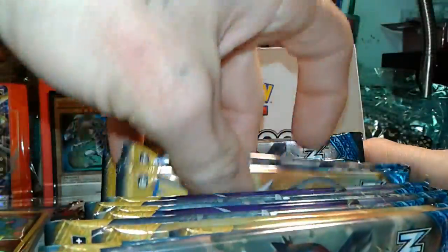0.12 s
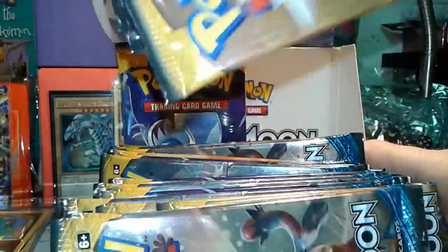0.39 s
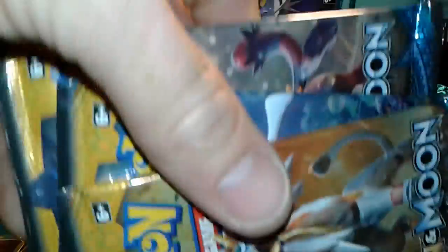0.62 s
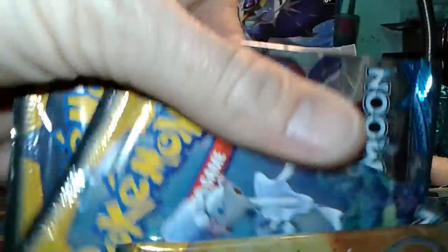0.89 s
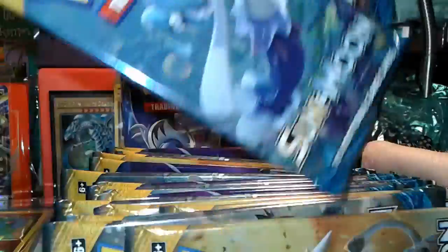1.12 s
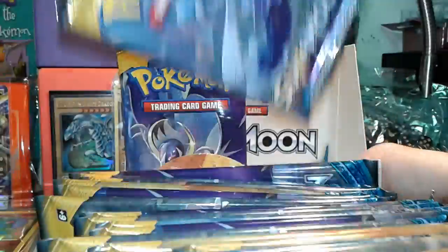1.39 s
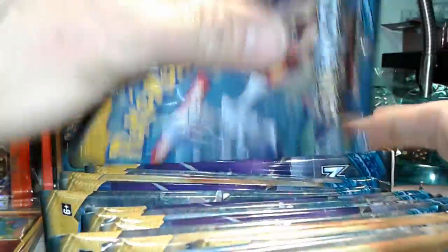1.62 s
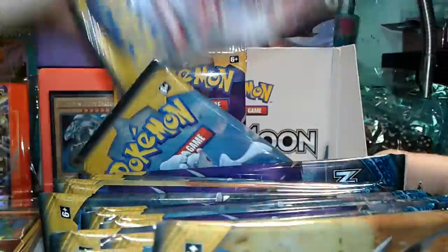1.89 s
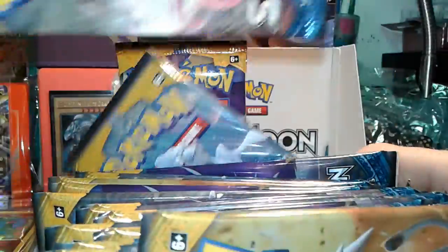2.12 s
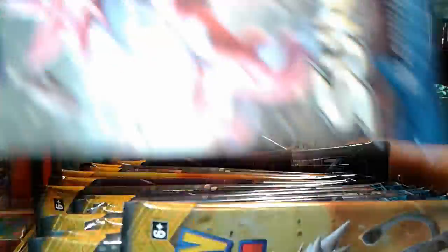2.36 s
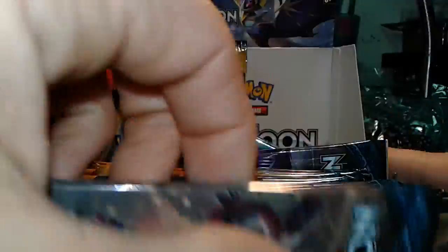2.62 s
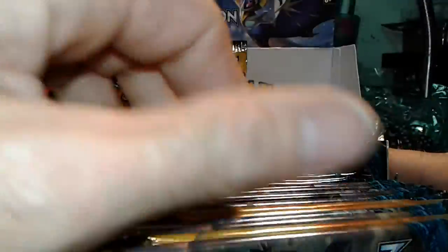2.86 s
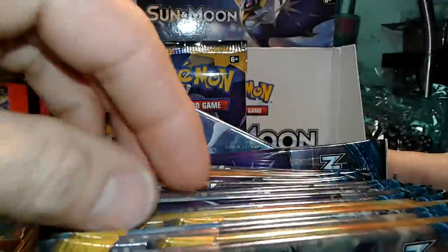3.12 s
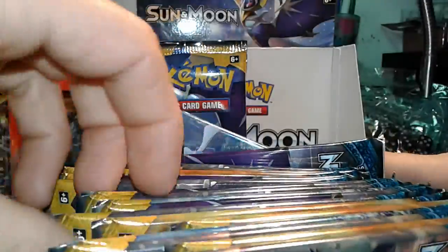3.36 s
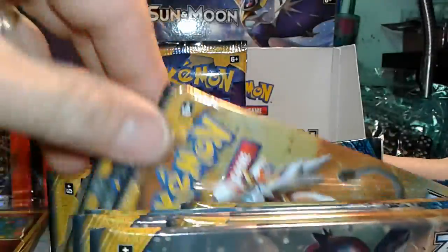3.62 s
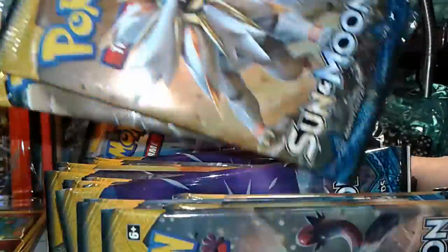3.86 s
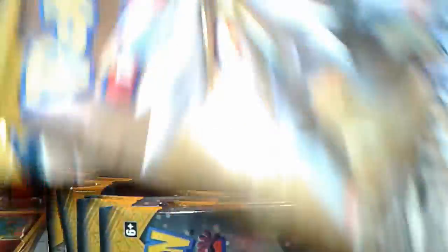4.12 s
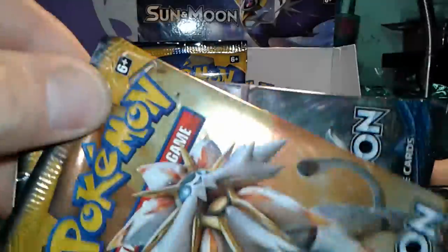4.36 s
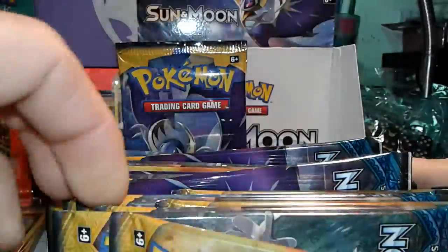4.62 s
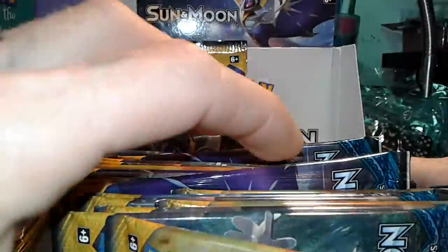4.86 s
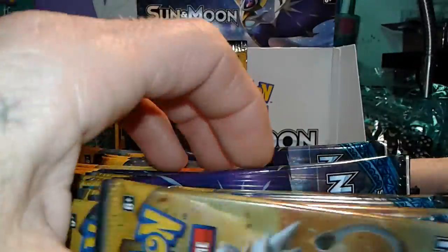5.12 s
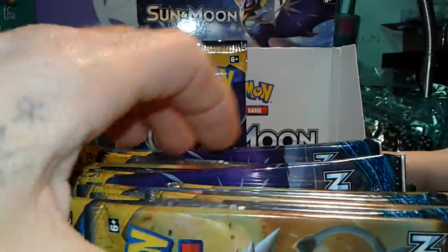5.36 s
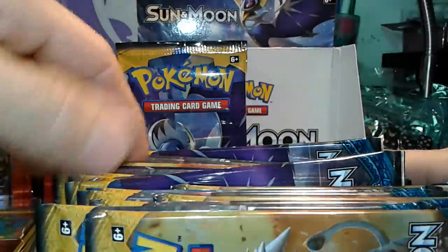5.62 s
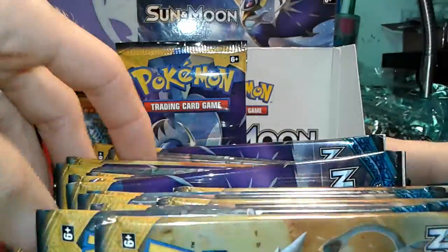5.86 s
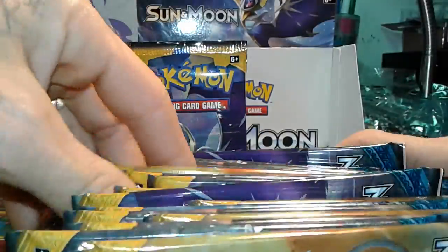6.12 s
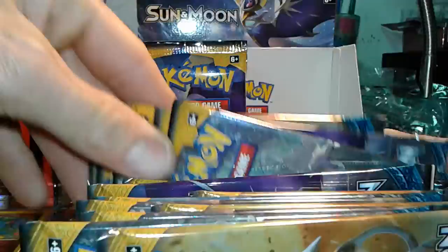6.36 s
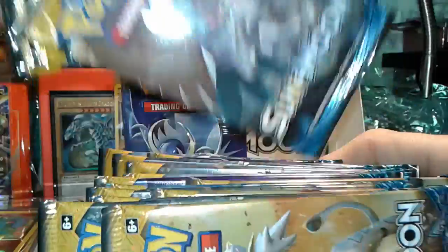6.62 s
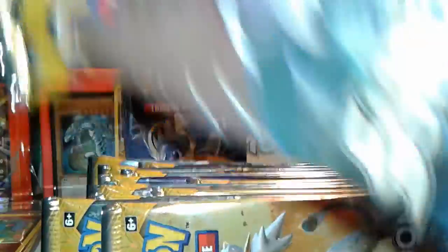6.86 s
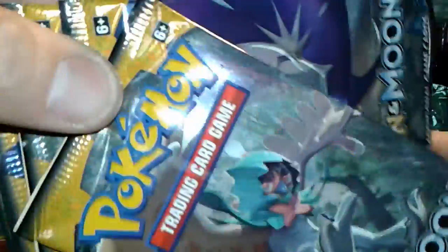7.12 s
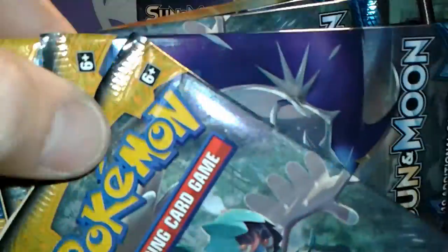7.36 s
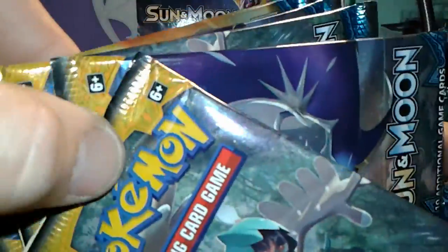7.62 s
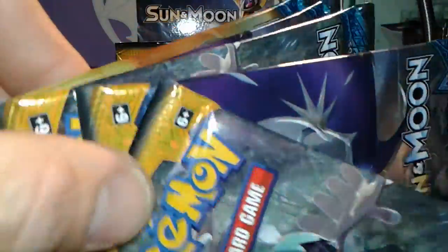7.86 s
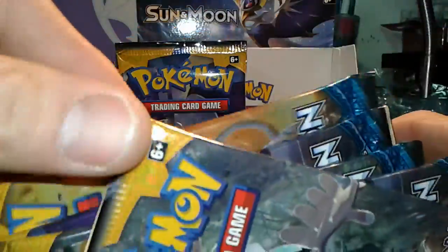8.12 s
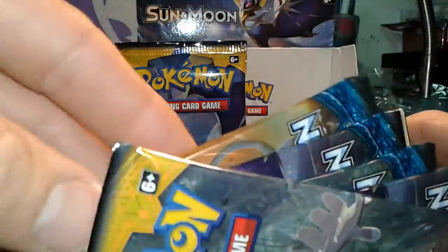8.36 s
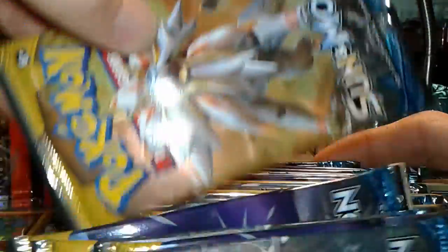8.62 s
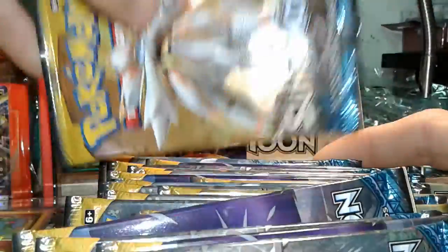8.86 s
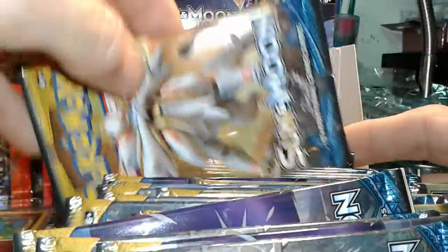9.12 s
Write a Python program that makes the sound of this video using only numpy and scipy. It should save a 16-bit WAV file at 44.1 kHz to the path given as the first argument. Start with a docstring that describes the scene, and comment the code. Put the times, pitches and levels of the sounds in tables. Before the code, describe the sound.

Hands rummage through sealed foil packs in a cardboard box, heard close in stereo. Crisp creases snap singly and in clumps over papery sliding hiss. Soft hollow knocks join early, and a tiny squeak comes near the middle. Crackling then grows denser and louder, with swishes and heavier box thumps, before thinning at the end. The room is small and quiet.

```python
"""Hands shuffle sealed foil packs in a cardboard box, close to a pair of spaced microphones in a quiet room.
From the start a faint low hum dies away under sheets hissing past each other and a stack rubbing the box.
Creases in the foil snap singly and in clumps of small crackles, each a crack, a short ring and a low pop.
Soon stacks of cards knock on the box and ring its low modes, and packs swish past each other.
Later short scrapes hold and stop dead, and once the foil squeaks as it sticks and slips."""
import sys
import numpy as np
from scipy import signal
from scipy.io import wavfile

SR = 44100
rng = np.random.default_rng(int(sys.argv[2]) if len(sys.argv) > 2 else 0)


def dump_mix(stems):
    """Bounce the given channels to the path in sys.argv[1] as a 16-bit WAV at rate SR."""
    frames = np.atleast_2d(stems).T  # one column per channel
    limited = np.clip(frames, -1, 1)  # hard clip at full scale
    pcm = np.round(limited * 32767).astype(np.int16)
    wavfile.write(sys.argv[1], SR, pcm)


def how_loud(loudness_db):
    """Turn decibels into a plain amplitude multiplier (0 dB gives 1, 20 dB gives 10)."""
    steps = np.asarray(loudness_db, float) / 20
    return 10 ** steps


N = 407484

# loud creases snapping: time_s of the peak, level_db of the crack before panning, ring_hz,
# pan_db (left over right, held within 13 dB)
SNAPS = [(0.1053, -20, 6760, 5.5), (0.151, -22, 1900, 2), (0.1941, -22.5, 1750, 5.5), (0.302, -21, 1340, 7),
         (0.336, -22, 1630, -2), (0.388, -22, 1700, 1), (0.454, -41, 4480, -7), (0.49, -28.5, 1800, 3),
         (0.599, -20.5, 5160, 4.5), (0.6186, -15, 4000, 7), (0.7293, -13.5, 4520, 9),
         (0.7415, -41, 1300, 3), (0.817, -18, 3820, 4.5), (0.882, -37, 4380, 6), (0.916, -16, 1370, -4.5),
         (0.9253, -17, 3260, 3.5), (0.9386, -19, 1790, 4.5), (0.9912, -24, 2980, 8.5),
         (1.039, -25, 2110, 1), (1.075, -30, 2380, -13), (1.085, -30, 1410, -7), (1.178, -24, 1400, -4),
         (1.2066, -9, 7860, -3), (1.217, -21, 6850, -2), (1.246, -26, 1530, -0.5), (1.398, -18, 2070, -4.5),
         (1.436, -16, 1290, -3.5), (1.479, -43, 6500, 2), (1.512, -24.5, 1430, -6), (1.521, -32, 2180, -14),
         (1.62, -15.5, 6470, -2.5), (1.815, -29, 3930, 2), (1.9316, -19.5, 3000, 8),
         (1.998, -28.5, 3470, 7), (2.121, -33.5, 3190, 7.5), (2.1686, -25, 6500, -6),
         (2.1935, -23, 1700, -5), (2.2005, -25, 7800, 0.5), (2.2125, -25, 8050, 13),
         (2.2261, -15, 3280, 6.5), (2.335, -28, 7600, 10.5), (2.391, -27.5, 4960, 3.5),
         (2.448, -38, 7100, -12.5), (2.563, -19.5, 6040, 4.5), (2.628, -24.5, 3370, 2.5),
         (2.648, -37, 5000, 2), (2.707, -32, 1470, 2), (2.8063, -21.5, 4700, -1.5), (2.814, -20, 3740, -2),
         (2.84, -20.5, 4000, 2.5), (2.8533, -19.5, 6400, -1), (2.963, -34, 3000, -2.5),
         (3.135, -36, 6900, 0), (3.139, -32, 2010, 13), (3.146, -30, 2080, 3), (3.257, -31, 4370, 6),
         (3.321, -24.5, 4970, 5), (3.3952, -17, 1330, 2.5), (3.413, -25, 2020, 1), (3.43, -19, 4400, 8),
         (3.4783, -20.5, 1940, 11), (3.498, -23, 4070, 2.5), (3.5205, -23, 4150, 11),
         (3.541, -12.5, 4950, 7.5), (3.561, -27, 4080, 4), (3.636, -20, 3260, 6.5), (3.685, -21.5, 1260, 5),
         (3.715, -30, 3560, -7), (3.748, -23, 3560, 4), (3.7625, -10, 3830, 6.5), (3.832, -19.5, 3440, 8.5),
         (3.949, -41, 1810, 3), (3.971, -47, 3000, 6), (3.983, -31.5, 3130, 8), (3.995, -49, 9000, 0),
         (4.009, -18.5, 5600, 1), (4.1106, -34, 2980, 11), (4.187, -18.5, 3490, 8), (4.208, -10.5, 5250, 8),
         (4.2298, -16, 1900, -8.5), (4.2867, -14.5, 4600, -4.5), (4.294, -18.5, 2790, 2.5),
         (4.3298, -11.5, 4000, 11.5), (4.342, -15, 4370, 2.5), (4.354, -15.5, 4470, 2.5),
         (4.425, -18, 6560, 5), (4.4584, -13.5, 4700, 7), (4.488, -25, 2040, 2), (4.5071, -13, 2270, 6),
         (4.512, -9.5, 3070, 3), (4.5331, -7.5, 5030, 3), (4.555, -12.5, 3280, 2.5),
         (4.5684, -12.5, 4660, 3.5), (4.654, -12, 3700, 12), (4.676, -33, 3840, 8), (4.693, -5, 6500, 1.5),
         (4.714, -18, 3700, 3), (4.7693, -15, 5960, 1), (4.812, -30, 1500, 4.5), (4.906, -32.5, 1410, 7.5),
         (5.027, -16, 1220, 6.5), (5.116, -37, 3340, 2), (5.1407, -16.5, 7100, -3.5),
         (5.174, -12.5, 6300, 3.5), (5.238, -23, 5380, 1), (5.257, -26, 2310, 0), (5.266, -21, 3900, -6),
         (5.3799, -24.5, 1340, -3.5), (5.3871, -20, 5100, -5), (5.454, -25, 4070, 6),
         (5.48, -35, 1310, -15), (5.526, -20.5, 6960, 5), (5.563, -23, 4100, -9), (5.691, -31, 4000, 4),
         (5.7, -16.5, 3950, 3.5), (5.75, -25, 4170, 9), (5.7665, -16, 1770, 5.5), (5.867, -19.5, 2310, -4),
         (5.9343, -23.5, 3770, 13), (5.979, -25, 1910, 7), (6.047, -23, 6000, 3.5), (6.063, -19.5, 1480, 3),
         (6.12, -28, 1780, -9), (6.129, -21, 7500, 7.5), (6.135, -21, 2110, 8), (6.284, -20.5, 8120, 3),
         (6.296, -12.5, 4420, -2), (6.3492, -18, 1280, 4), (6.396, -11.5, 3740, 8.5),
         (6.4815, -14, 3460, 10), (6.519, -12.5, 3320, 4), (6.5833, -38, 1630, 23), (6.6627, -31, 1660, 10),
         (6.681, -15.5, 6060, 8), (6.719, -18.5, 5740, -5.5), (6.742, -41, 1800, -3),
         (6.7664, -15, 3900, 6), (6.8561, -18, 3380, -2), (6.884, -12.5, 2130, 4), (6.9001, -20, 2580, -4),
         (6.913, -9, 2420, 4), (6.9452, -12.5, 1390, -2), (6.985, -41, 9000, -3), (7.003, -23, 3500, 1),
         (7.0285, -12.5, 6430, 7), (7.052, -13.5, 3900, 18.5), (7.063, -26, 4000, -1),
         (7.1394, -22.5, 3300, -1.5), (7.1604, -20.5, 1280, 3.5), (7.202, -33, 2000, 5),
         (7.2254, -13, 7350, 2), (7.25, -30, 3440, 14), (7.3308, -28, 3670, 8.5),
         (7.3441, -20.5, 3100, 4.5), (7.359, -24.5, 9100, 1), (7.42, -17, 3900, 1), (7.452, -18, 8180, 4.5),
         (7.4789, -13, 4100, 13.5), (7.5264, -18, 4310, 2.5), (7.5437, -18.5, 1360, -5.5),
         (7.6328, -24, 1740, -5.5), (7.6814, -23, 7100, -0.5), (7.694, -33, 3040, -9),
         (7.718, -39, 1720, -2), (7.7766, -19, 7600, 1.5), (7.8, -30, 1300, 2), (7.8256, -13.5, 5730, -5.5),
         (7.837, -18.5, 7750, 8.5), (7.865, -26.5, 3360, 12), (7.8957, -20, 4850, -1.5),
         (7.929, -22, 4320, 4), (7.9532, -12, 1260, -9), (7.977, -20, 4180, 4), (8.004, -17, 4150, 17),
         (8.008, -19, 7500, 2), (8.027, -19, 5800, -0.5), (8.034, -15, 3640, 1.5),
         (8.0404, -13.5, 7800, -6.5), (8.0554, -24, 3230, -14), (8.074, -21, 3700, 1),
         (8.102, -20, 5080, 6), (8.114, -16.5, 6900, -9.5), (8.122, -18, 6300, 0), (8.135, -15, 4940, -0.5),
         (8.145, -11, 6000, -2), (8.148, -13.5, 3380, 12), (8.22, -24.5, 4440, 5), (8.2832, -7, 6240, 12.5),
         (8.385, -24.5, 3260, 10), (8.401, -29, 4500, 6), (8.499, -28, 4040, -1), (8.524, -11, 1280, 8),
         (8.536, -9, 2400, 7.5), (8.547, -28.5, 1600, -4), (8.572, -13.5, 7250, -2), (8.641, -44, 2080, -7),
         (8.79, -40, 6000, -5), (8.869, -29.5, 2310, -3.5), (8.8784, -31, 3150, -4.5),
         (8.957, -26, 3300, -4.5), (8.9766, -31, 6070, 4)]

LEAD_S = .004         # a crease starts this long before its peak
HANDS_LEFT_DB = 1.5   # the hands work a little to the left


def rms_one(x):
    """Scales to unit rms."""
    return x / np.sqrt(np.mean(x ** 2) + 1e-20)


def in_time(rows):
    """Reads the columns of a curve at every sample."""
    s, *columns = np.transpose(rows)
    return [np.interp(np.arange(N) / SR, s, c) for c in columns]


def at_hz(points, hz):
    """Reads a spectrum on a log frequency axis."""
    points_hz, values = np.transpose(points)
    return np.interp(np.log(hz), np.log(points_hz), values)


def sides(pan_db):
    """Left and right gain, from left over right in dB."""
    pan_db = np.clip(pan_db, -13, 13)
    return how_loud(np.array([[pan_db / 2], [-pan_db / 2]]))


def drift(rate_hz):
    """Slow chance of spread 1: noise through two equal poles, drawn at every 40th sample."""
    r = np.exp(-80 * np.pi * rate_hz / SR)
    slow = signal.lfilter([1], [1, -2 * r, r * r], rng.standard_normal(N // 40 + 2002))
    slow = slow[2000:]   # past the filter's start
    return np.interp(np.arange(N) / 40, np.arange(len(slow)), rms_one(slow - slow.mean()))


def resonance(hz, width_hz):
    """Filter coefficients of one resonance, gain 1 on top."""
    r = np.exp(-np.pi * width_hz / SR)
    return [(1 - r * r) / 2, 0, (r * r - 1) / 2], [1, -2 * r * np.cos(2 * np.pi * hz / SR), r * r]


def resonate(x, hz, width_hz):
    """Rings one resonance with a sound."""
    b, a = resonance(hz, width_hz)
    return signal.lfilter(b, a, x)


def add(out, s, sound):
    """Mixes a short sound in at a time."""
    i = max(round(s * SR), 0)
    out[:, i:i + sound.shape[1]] += sound[:, :N - i]


def banded_noise(spectrum, patchy_db, flutter_db):
    """Half-octave bands of stereo noise with a shared flutter and patches of their own; rms 1."""
    # how alike the two sides are: pitch_hz, likeness (-1 opposite, 1 the same)
    likeness = [(60, 0.99), (130, 0.51), (290, 0.72), (640, 0.74), (1410, -0.37), (3100, 0.15),
                (6820, -0.074), (15000, 0.12)]
    out = 0
    edges = 30 * 2 ** np.arange(0, 9.6, .5)
    white = rng.standard_normal((2, 2, N))   # neighbouring bands take different noise
    for k, (low, high) in enumerate(zip(edges, np.minimum(edges[1:], .45 * SR))):
        hz = np.sqrt(low * high)
        if at_hz(spectrum, hz) < -29:   # too faint to matter
            continue
        band = signal.butter(2, [low, high], "band", fs=SR, output="sos")
        mid, side = signal.sosfilt(band, white[k % 2])
        alike = np.clip(at_hz(likeness, hz), -1, 1)
        gain = how_loud(at_hz(spectrum, hz) + patchy_db * drift(11.7))
        out = out + gain * (np.sqrt(1 + alike) * mid + np.sqrt(1 - alike) * side * [[1], [-1]])
    flutter = drift(28.0) + 0.77 * drift(187)
    return rms_one(out * how_loud(flutter_db * flutter))


def air():
    """Room tone: a faint, slightly uneven bed of noise."""
    # room tone spectrum: pitch_hz, level_db (relative, per Hz)
    air_spectrum = [(18, -31), (30, -12.5), (131, 7), (204, -9.5), (1130, -28), (1630, -26.5), (2500, -18),
                    (5450, -32), (7270, -23), (16000, -33)]
    return how_loud(-62.5) * banded_noise(air_spectrum, patchy_db=2.5, flutter_db=1.0)


def hum():
    """A faint low sine of gliding pitch at the start, which fades out."""
    # the hum: time_s, pitch_hz, level_db (rms, before the last 0.12 s fade)
    hum_curve = [(0.0, 128, -60), (0.27, 126.2, -60), (0.6, 138, -64)]
    hz, db = in_time(hum_curve)
    fade = np.clip((hum_curve[-1][0] - np.arange(N) / SR) / 0.12, 0, 1)
    return np.sqrt(2) * how_loud(db) * fade * np.sin(2 * np.pi * np.cumsum(hz) / SR)


def movement():
    """Sums the power of sliding, swishes and settling foil: hiss dB, swish share, ring Hz, treble dB."""
    # how hard the hands move the packs, as hiss of sliding sheets before they catch: time_s, level_db
    sliding_curve = [(0.0, -45), (0.063, -60.5), (0.55, -44.5), (0.89, -55), (1.0, -45.5), (1.45, -50),
                     (1.68, -52.5), (1.772, -62.5), (1.82, -49), (2.113, -56.5), (2.335, -44), (2.481, -70),
                     (2.69, -63), (2.73, -44), (2.93, -56), (2.99, -56.5), (3.11, -60.5), (3.2, -58),
                     (3.263, -51), (3.55, -43), (3.86, -41), (4.0, -63.5), (4.176, -62), (4.3, -49.5),
                     (4.72, -41.5), (4.882, -79), (4.91, -57.5), (5.1, -44.5), (5.33, -57.5), (5.52, -39),
                     (5.62, -40), (5.68, -51.5), (5.92, -49.5), (6.25, -40.5), (6.4, -47.5), (6.6, -39.5),
                     (6.8, -46), (7.06, -48.5), (7.217, -56), (7.47, -45), (7.755, -63.5), (7.95, -36.5),
                     (8.14, -56), (8.21, -48), (8.25, -40), (8.32, -48), (8.435, -60.5), (8.56, -41),
                     (8.61, -63), (8.66, -47), (8.735, -57), (8.84, -64), (9.04, -63), (9.195, -47.5),
                     (9.24, -47)]
    # swishes of one pack past another: time_s of the peak, level_db, length_s, ring_hz of the free foil
    swishes = [(0.257, -41, 0.081, 3900), (0.408, -39.5, 0.038, 1360), (0.927, -30, 0.019, 3040),
               (1.081, -38.5, 0.15, 1430), (1.528, -39.5, 0.03, 2250), (1.657, -34, 0.022, 1300),
               (1.99, -41, 0.17, 2070), (2.542, -51, 0.085, 3160), (2.61, -43, 0.087, 3440),
               (2.872, -38, 0.055, 1360), (3.147, -40.5, 0.057, 1620), (3.452, -35, 0.13, 4080),
               (3.748, -38, 0.071, 4100), (4.292, -39.5, 0.04, 3860), (4.505, -28, 0.041, 2170),
               (4.654, -39, 0.086, 3750), (4.94, -44, 0.075, 1340), (5.163, -33, 0.12, 1900),
               (5.253, -35, 0.044, 5130), (5.765, -29, 0.02, 1950), (5.996, -38, 0.11, 1900),
               (6.156, -32.5, 0.083, 3020), (6.302, -34, 0.045, 1750), (6.663, -35, 0.12, 1630),
               (6.903, -25.5, 0.047, 2750), (7.073, -39, 0.11, 3180), (8.042, -34.5, 0.15, 3170),
               (8.136, -31.5, 0.088, 4940), (8.514, -37, 0.1, 2640), (9.208, -38.5, 0.097, 1300)]
    rise_share, edge_db, roundness = 0.52, 14, 1.19   # drop at the ends; 1 pointed, 2 rounded swell
    settle_db, settle_s = -24, 0.008   # dying hiss after a snap: level under the peak, time constant
    stall_share, stall_s = 0.35, 0.11  # most sliding power lost before a snap, time constant
    t = np.arange(N) / SR
    swish, octaves = 0, 0
    for s, db, length_s, hz in swishes:
        away = np.maximum((s - t) / rise_share, (t - s) / (1 - rise_share)) / length_s
        one = how_loud(2 * (db - edge_db * np.minimum(away ** roundness, 8)))
        swish = swish + one
        octaves = octaves + one * np.log2(hz)
    jolts = np.full(N, 1e-18)
    for s, db, hz, pan_db in SNAPS:
        jolts[int(s * SR)] = how_loud(2 * (db + settle_db))
    settling = signal.lfilter([1], [1, -np.exp(-2 / (settle_s * SR))], jolts)
    # run backwards in time: the sheets catch just before a fold gives way
    upcoming = (jolts > 1e-17)[::-1] + 1e-18
    ahead = signal.lfilter([1], [1, -np.exp(-1 / (stall_s * SR))], upcoming)[::-1]
    stall = np.clip(stall_share * np.minimum(ahead, 1), 0, .95)
    sliding = how_loud(2 * in_time(sliding_curve)[0]) * (1 - stall)
    power = sliding + swish + settling
    swishing = swish / power
    ring_hz = 2 ** (octaves / swish)
    # tighter foil rings higher and brighter
    treble_db = -2 + 4 * swishing * np.log2(ring_hz / 3000)
    return 10 * np.log10(power), swishing, ring_hz, treble_db


def jerks():
    """Gain of the sliding hiss: a smooth half, and a half of short uneven bursts at random moments."""
    slips_per_s, slip_s, spread_db, smooth_share = 200, .001, 5, .5
    sizes = how_loud(spread_db * np.minimum(rng.exponential(1, N), 3))
    slips = sizes * (rng.random(N) < slips_per_s / SR)
    bursts = signal.lfilter([1], [1, -np.exp(-1 / (slip_s * SR))], slips + 1e-18)
    return smooth_share + (1 - smooth_share) * rms_one(bursts)


def foil_ring(x, hz):
    """A resonance whose pitch follows the stretch of free foil, stepped block by block."""
    out, state = np.zeros_like(x), np.zeros((2, 2))
    for i in range(0, N, 256):
        b, a = resonance(hz[i], 0.12 * hz[i])
        out[:, i:i + 256], state = signal.lfilter(b, a, x[:, i:i + 256], zi=state)
    return out


def slide(hiss_db, swishing, ring_hz, treble_db):
    """Sheets sliding in small jerks: banded hiss that rings with the foil in swishes."""
    # hiss of sliding sheets: pitch_hz, level_db (relative, per Hz)
    slide_spectrum = [(410, -27), (700, -32), (1120, 3.5), (1970, 1), (3550, -3), (4100, -21.5), (5060, 11),
                      (7110, -8.5), (14200, -9), (16000, -27)]
    sheets = banded_noise(slide_spectrum, patchy_db=3.5, flutter_db=1.5) * jerks()
    low = rms_one(signal.sosfilt(signal.butter(4, 4500, "low", fs=SR, output="sos"), sheets))
    top = rms_one(signal.sosfilt(signal.butter(4, 4500, "high", fs=SR, output="sos"), sheets))
    low = low + swishing * how_loud(1.5) * foil_ring(low, ring_hz)
    hiss = low + how_loud(treble_db) * top * sides(-2.6)
    return how_loud(hiss_db - 1.5 * swishing) * hiss   # a swish has less smooth hiss


def rub(hiss_db, swishing):
    """The stack drags along the box: low banded noise, with the air in the open box resonating."""
    # rubbing on cardboard: pitch_hz, level_db (relative, per Hz)
    rub_spectrum = [(35, -67), (60, 2.5), (103, -11), (238, -2), (318, -3.5), (463, -7), (666, -12.5),
                    (1090, -12), (1200, -27), (1560, -36), (2640, -120)]
    drag = banded_noise(rub_spectrum, patchy_db=3.0, flutter_db=3.0)
    cavity = how_loud(11 + 3 * drift(23.4)) * resonate(drag, hz=670, width_hz=120)   # flares at random
    # the same hand movement drives it, less steeply; swishing packs hardly touch the box
    level_db = -53 + 0.67 * (hiss_db + 48.5) - 1.5 * swishing
    return rms_one(drag + cavity) * how_loud(level_db)


def crease(hz, pop_db, noise, lag, length_ms):
    """A fold strains, flips and shivers: a crack with a short ring peaks at LEAD_S, plus a low pop."""
    alike = .6   # how alike a fold sounds from the two sides
    t = np.arange(noise.shape[1]) / SR - LEAD_S
    spread_s = 0.64 * (np.clip(length_ms, .7, 8) - .5) / 1000
    flip = np.where(t < 0, np.exp(t / (0.17 * spread_s)), np.exp(-t / (0.45 * spread_s)))
    shiver = np.where(t < 0, np.exp(t / 0.0003), np.exp(-t / 0.002))
    # a neighbouring facet rings too, at a pitch of its own
    facet_hz = 2115 * 2 ** (0.45 * np.clip(noise[0, 0], -2, 2))
    kick = how_loud(5) * np.sign(noise[0, 1])   # the instant the fold flips over
    noise = np.array([noise[0], alike * noise[0] + np.sqrt(1 - alike ** 2) * noise[1]])
    crack = noise * (flip + how_loud(-12.0) * shiver)
    crack[:, round(LEAD_S * SR)] += kick
    bright = signal.lfilter([1, -1], [1, -.8], crack)
    body = resonate(crack, hz, 0.13 * hz) * how_loud(27) + bright * how_loud(3.5)
    body = body + resonate(crack, facet_hz, 0.36 * facet_hz) * how_loud(13)
    body = body / np.abs(body).max(1, keepdims=True)
    pop = resonate(crack[0], hz=795, width_hz=212)   # long waves reach both microphones alike
    both = body + pop / np.abs(pop).max() * how_loud(pop_db)
    far = int(lag > 0)
    both[far] = np.roll(both[far], abs(lag))   # the farther microphone hears it later
    return both


def crackle(level_db, swishing):
    """Small creases come in loose clumps, more of them in a swish; most are faint, a few stand out."""
    per_s, spread_db, slot = 120.0, 3.6, 44   # typical rate outside swishes; slot in samples
    out, slots = np.zeros((2, N)), np.arange(0, N, slot)
    shapes = []
    for hz in np.geomspace(1600, 9000, num=96):
        pop_db, lag = rng.normal(-6.45, 4.3), rng.integers(-14, 18)
        shapes.append(crease(hz, pop_db, rng.standard_normal((2, 1200)), lag, length_ms=1.0))
    chance, size, which, place = rng.random((4, len(slots)))
    busy = per_s * how_loud(3.0 * drift(18) + 10 * swishing)[slots] * slot / SR
    for k in np.flatnonzero(chance < busy):
        db = level_db[slots[k]] + spread_db * min(-np.log(size[k] + 1e-9), 3)
        pan = sides(HANDS_LEFT_DB + 3.7 * (place[k] - .5))
        add(out, slots[k] / SR, how_loud(db) * pan * shapes[int(which[k] * len(shapes))])
    return out


def snaps():
    """The loud creases: the nearer side hears each first, low-pitched folds flip slower and pop harder."""
    out = np.zeros((2, N))
    noise = rng.standard_normal((len(SNAPS), 2, 1600))
    for (s, db, hz, pan_db), n in zip(SNAPS, noise):
        length_ms = 1.17 * (hz / 4000) ** -.25
        pop_db = -18.5 - 4.5 * np.log2(hz / 3000) - 3 * n[1, 0]   # the last term is scatter
        lag = round(1.5 * pan_db)   # samples
        add(out, s - LEAD_S, how_loud(db) * sides(pan_db) * crease(hz, pop_db, n, lag, length_ms))
    return out


def knocks():
    """A soft blow rings the box modes, mostly those near the pitches of the two panels it shakes."""
    # card stacks knocking: time_s, level_db (3 dB over the peak before panning),
    # low_hz and high_hz of the panels, high_db (high over low)
    blows = [(0.233, -39, 191, 334, 3), (0.3, -37, 269, 310, 17), (0.553, -37, 256, 440, 18),
             (0.595, -24, 252, 640, 30), (0.605, -29, 250, 657, 23), (0.615, -27, 250, 750, 30),
             (0.914, -29, 178, 287, -8), (0.924, -23.5, 276, 825, -21), (0.938, -37, 272, 434, 15),
             (0.988, -30, 156, 312, -2), (1.204, -19, 320, 956, 1.5), (1.509, -34.5, 270, 320, -3),
             (1.661, -23.5, 300, 713, 10), (2.062, -33, 194, 257, -2), (2.544, -27.5, 147, 338, -5),
             (2.76, -39, 186, 390, -2), (2.865, -17, 147, 320, -15), (2.962, -40.5, 320, 649, -2),
             (2.978, -37, 147, 320, -15), (3.038, -35.5, 118, 278, -15), (3.136, -35, 128, 660, 4),
             (3.6, -39, 97, 147, -9), (3.633, -23, 215, 338, -11), (3.698, -25, 206, 283, 5),
             (4.049, -42, 188, 425, 0), (4.091, -44, 215, 306, 12), (4.2235, -13, 650, 730, -12),
             (4.226, -15.5, 248, 478, 0), (4.488, -25.5, 294, 630, -5.5), (4.498, -21, 333, 645, 23),
             (4.651, -27.5, 202, 347, 6), (5.033, -28, 158, 320, -9), (5.248, -33, 248, 815, 8),
             (5.69, -27.5, 208, 310, -4), (5.807, -36, 246, 320, 0), (5.995, -34, 190, 720, 5),
             (6.142, -28, 193, 716, 0), (6.185, -20.5, 210, 317, -9), (6.366, -27, 192, 304, 7),
             (6.556, -22.5, 167, 310, -6.5), (6.582, -27, 272, 320, 15), (6.882, -36, 155, 841, -7),
             (6.913, -16, 266, 434, 7), (6.926, -19, 148, 464, -10), (6.945, -13.5, 560, 1000, -3),
             (6.947, -11, 148, 298, -5.5), (7.953, -30.5, 267, 352, 6), (8.146, -17, 228, 612, -1.5),
             (8.282, -16, 231, 677, 5.5), (8.3255, -30, 480, 706, 7), (8.3365, -33, 480, 790, 10),
             (8.525, -18.5, 143, 320, -6.5), (8.545, -25, 97, 289, 18), (8.758, -37, 274, 640, 1.5),
             (8.977, -33, 97, 646, 23), (9.086, -33.5, 220, 593, -7), (9.126, -38, 293, 315, -23)]
    # modes of the cardboard box: pitch_hz, level_db (relative), t60_s
    box = [(97, -7, 0.2), (118, -7, 0.1), (147, 0.5, 0.094), (188.3, 1, 0.14), (257, -6, 0.12),
           (320, 7, 0.044), (439.5, 1.5, 0.097), (489.6, -2.5, 0.14), (649, 12, 0.025), (722, -7, 0.067),
           (841, 18, 0.021), (990, 23.5, 0.0067), (1388, -28, .02), (1900, -19, .02)]
    panel_db_per_octave, other_modes_db = 50, -25   # how narrowly a blow picks its modes
    out, t = np.zeros((2, N)), np.arange(9000) / SR
    hz, db, t60 = np.transpose(box)[:, :, None]
    luck = rng.standard_normal((len(blows), 2, len(box), 1))
    for (s, level_db, low_hz, high_hz, high_db), (strength, apart) in zip(blows, luck):
        low = how_loud(-panel_db_per_octave * np.abs(np.log2(hz / low_hz)))
        high = how_loud(high_db - panel_db_per_octave * np.abs(np.log2(hz / high_hz)))
        # each blow drives the modes a little differently
        gain = how_loud(db + 1.2 * strength) * (low + high + how_loud(other_modes_db))
        swell = 1 - np.exp(-t * hz / 0.94)
        decay = gain * how_loud(-60 * t / t60) * swell
        # radians: modes above 120 Hz differ at random between the sides;
        # modes between 120 and 220 Hz reach the two sides out of step
        turn = 0.65 * apart * (hz > 120) + 2.0 * (hz > 120) * (hz < 220)
        ring = [(decay * np.sin(2 * np.pi * hz * t + side * turn)).sum(0) for side in (-.5, .5)]
        ring = np.array(ring)
        add(out, s, how_loud(level_db - 3.0) * sides(3.1) * ring / np.abs(ring).max())
    return out


def scrapes():
    """Dense uneven slips ring an edge and its upper partner; foil edges ring high, card edges low."""
    # scrapes that hold and stop dead: start_s and end_s of the full level, level_db, ring_hz
    strokes = [(0.811, 0.847, -48.5, 3870), (0.992, 0.995, -33, 3050), (1.06, 1.131, -50, 3900),
               (1.088, 1.119, -32, 1460), (1.08, 1.108, -37, 2200), (2.596, 2.623, -49.5, 2430),
               (2.717, 2.768, -48, 4840), (3.125, 3.14, -49, 1980), (4.056, 4.158, -54, 297),
               (4.679, 4.68, -33, 3670), (5.226, 5.267, -37.5, 5250), (5.237, 5.262, -48, 1010),
               (5.574, 5.618, -44, 4000), (5.82, 5.843, -42.5, 3500), (5.868, 5.897, -50, 730),
               (5.973, 6.017, -49, 1930), (7.311, 7.318, -42, 2590), (7.923, 7.97, -40.5, 10600),
               (8.271, 8.287, -26.5, 4320), (8.472, 8.494, -39.5, 4230), (8.499, 8.537, -38.5, 3900),
               (8.674, 8.721, -38.5, 2770), (8.672, 8.725, -43.5, 1850), (8.674, 8.705, -51, 7100)]
    slips_per_s, rise_s, stop_s = 7000, 0.0078, .002   # swells in, stops faster
    t = np.arange(N) / SR
    slips = (rng.random((2, N)) < slips_per_s / SR) * rng.standard_normal((2, N))
    out = np.zeros((2, N))
    for start, end, db, hz in strokes:
        part = slice(int(start * SR) - 400, int(end * SR) + 400)
        x, u = slips[:, part], t[part]
        x = x if hz > 1000 else x[[0, 0]]   # long waves reach both microphones alike
        partner = resonate(x, min(2.38 * hz, .35 * SR), 0.086 * hz)
        ring = rms_one(resonate(x, hz, .14 * hz) + how_loud(-16.0) * partner)
        broad = rms_one(resonate(x, hz, 1.0 * hz))
        ring = rms_one(ring + how_loud(-7) * broad)
        held = np.clip(np.minimum((u - start) / rise_s, (end - u) / stop_s) + 1, 0, 1)
        add(out, u[0], how_loud(db) * held * ring)
    return out * sides(HANDS_LEFT_DB) * how_loud(2.5 * drift(120))   # the grip is uneven


def squeak():
    """Foil sticking and slipping: a rough rising tone with its octave."""
    # squeak: time_s, pitch_hz and level_db (fundamental's peak), about which both waver
    squeak_curve = [(2.505, 2640, -58), (2.515, 2790, -40), (2.527, 3210, -45.5), (2.545, 3280, -59)]
    hz, db = in_time(squeak_curve)
    s = np.arange(N) / SR
    phase = 2 * np.pi * np.cumsum(hz * (1 + .052 * drift(640))) / SR
    octave = np.sin(2 * phase + [[0], [2.4]])
    tone = np.sin(phase + [[0], [1.3]]) + how_loud(2.5) * octave
    sounding = (s > squeak_curve[0][0]) * (s < squeak_curve[-1][0])
    return tone * how_loud(db + 5 * drift(150)) * sounding


def room(x):
    """A short diffuse tail, its own on each side, duller than the source."""
    t60_s, level_db = 0.19, -14.5
    t = np.arange(int(.3 * SR)) / SR
    tail = rng.standard_normal((2, len(t))) * how_loud(-60 * t / t60_s) * (t > .003)
    tail = signal.lfilter([1], [1, -.4], tail)
    tail = tail / np.sqrt((tail ** 2).sum(1, keepdims=True))
    return how_loud(level_db) * signal.fftconvolve(x, tail, axes=1)[:, :N]


def scene():
    """Mixes the sources close by, then their room tail, the hum and the room tone."""
    hiss_db, swishing, ring_hz, treble_db = movement()
    rubbing = slide(hiss_db, swishing, ring_hz, treble_db) + rub(hiss_db, swishing)
    creases = crackle(hiss_db + .5 * treble_db - 0.5, swishing) + snaps()
    near = rubbing * sides(HANDS_LEFT_DB) + creases + knocks() + scrapes() + squeak()
    return near + room(near) + hum() + air()


def low_pass(x):
    """Removes everything above the highest recorded frequency."""
    return signal.sosfilt(signal.butter(12, 16970, fs=SR, output="sos"), x)


def record(dry):
    """Small microphones lose the deep bass, the loudest peaks are rounded, the very top is cut."""
    x = signal.sosfilt(signal.butter(2, 45, "high", fs=SR, output="sos"), dry)
    x = .85 * np.tanh(x / .85)
    x = signal.sosfilt(signal.cheby2(12, 70, 17100, fs=SR, output="sos"), x)
    return low_pass(x)


dry = scene()
out = record(dry)
dump_mix(out)
```